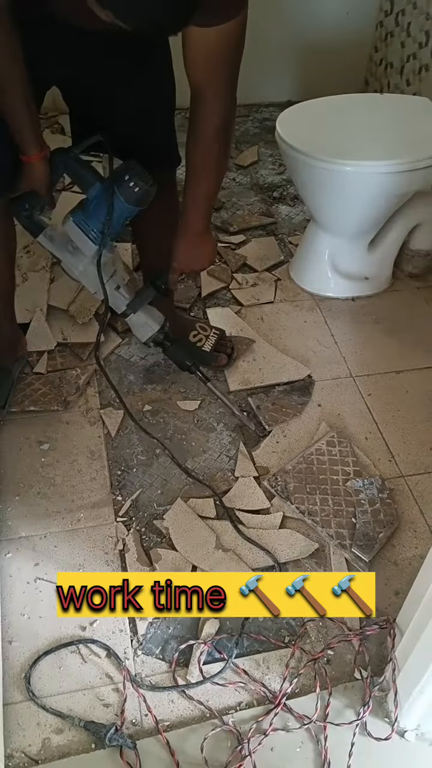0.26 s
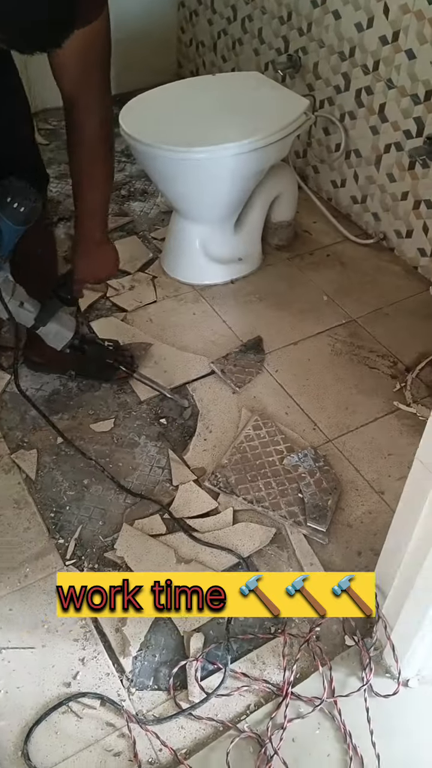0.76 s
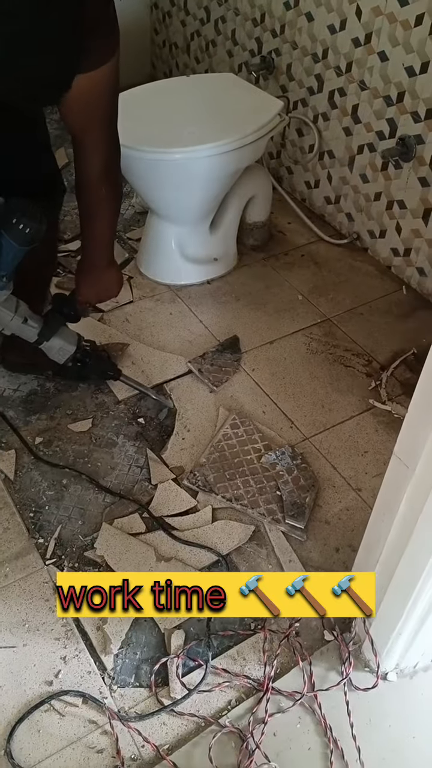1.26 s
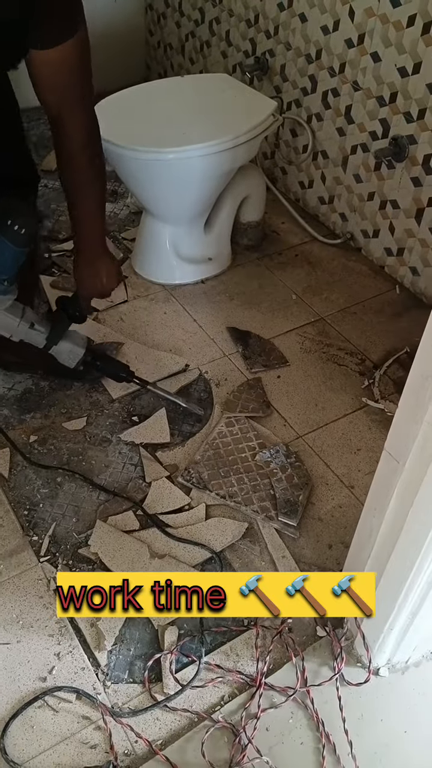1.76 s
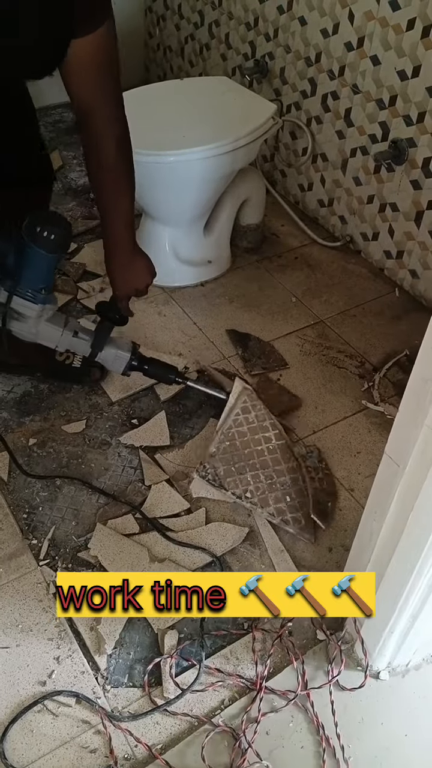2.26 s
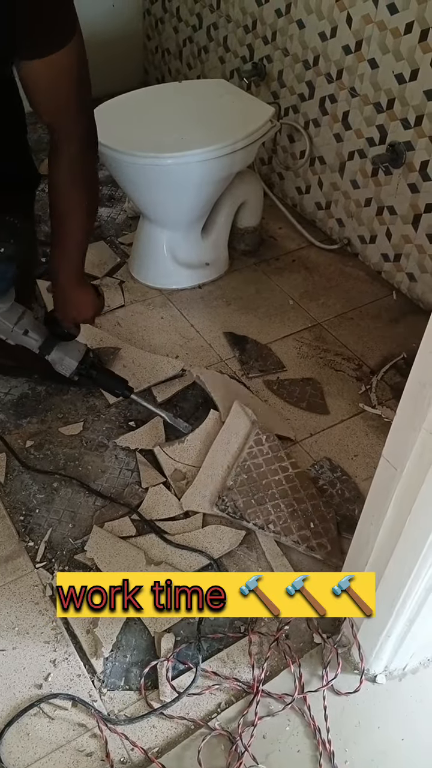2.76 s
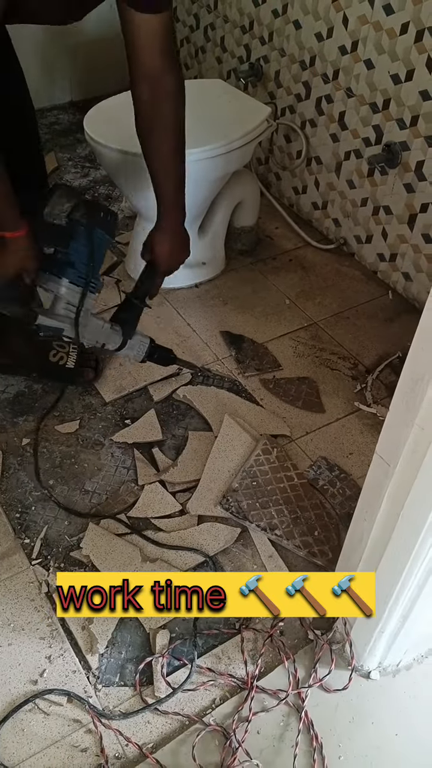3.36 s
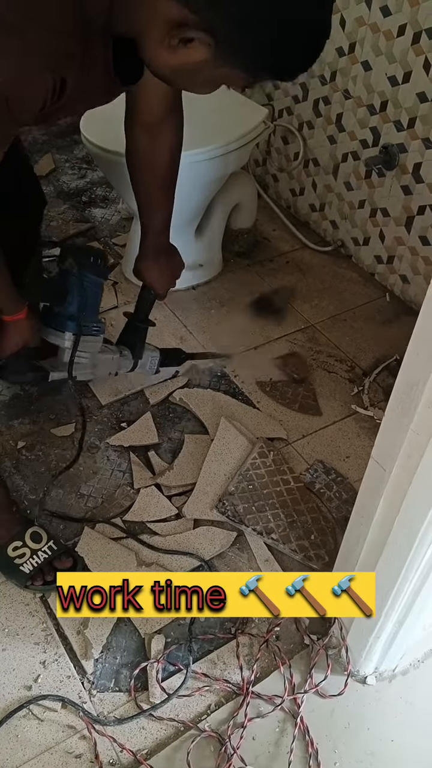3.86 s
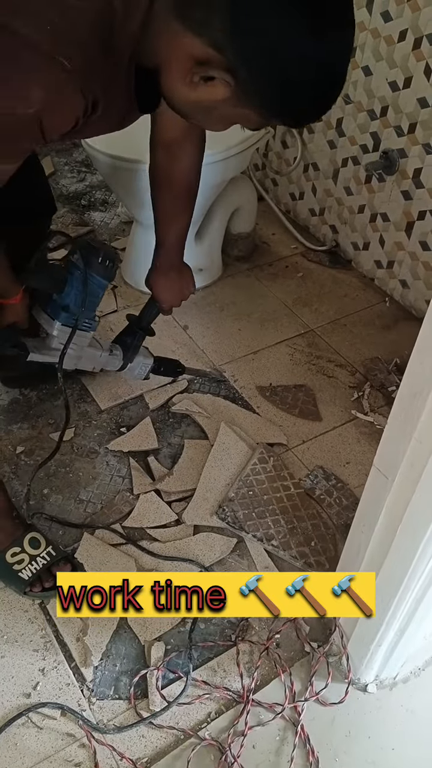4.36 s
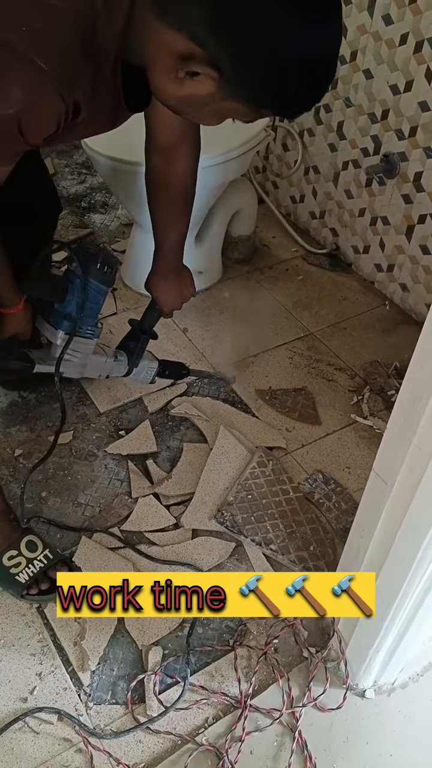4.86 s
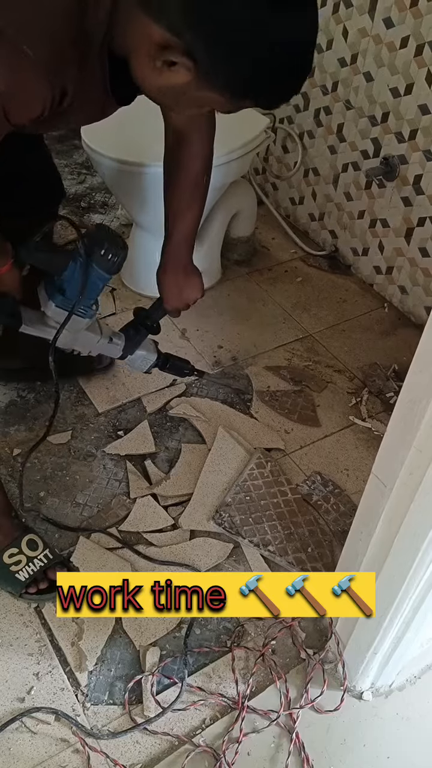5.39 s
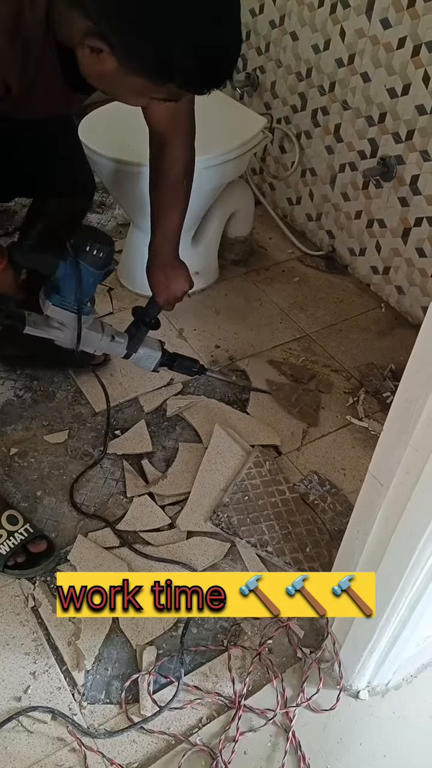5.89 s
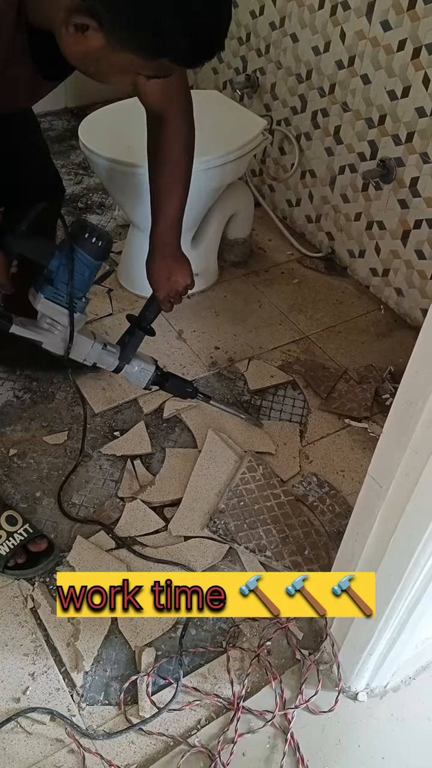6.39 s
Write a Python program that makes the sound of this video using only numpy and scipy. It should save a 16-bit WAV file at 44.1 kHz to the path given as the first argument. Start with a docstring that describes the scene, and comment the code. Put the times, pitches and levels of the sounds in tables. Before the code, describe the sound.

A close phone captures an electric demolition hammer in a small, echoing tiled bathroom. It starts mid-action with a 0.1-second burst of rapid hard blows, about 47 a second; shards ping at 0.3 and 0.7 while the motor whirs down. Grit crunches softly and a foot thuds near 1.1. Bursts at 1.5-1.7 and 2.1-2.4 sound hollower, the second booming with low air buffeting, ending in loud tile clatter and bright chisel clinks. From 2.5 to 3.8 pieces slide and ring, crumbs crunch and sandals scuff. A weaker, crisp burst comes at 3.9-4.1, followed by a clatter and a bright chip ping. Ringing bursts follow at 4.6-4.9 and 5.0-5.2, the latter ending in a dull shank rattle. Grit and a faint step lead to a partly hollow burst at 5.9-6.2, then small steel clinks, coasting motor and a low tile knock at 6.6.

```python
"""A short burst of hard blows opens: an electric demolition hammer chisels floor tiles in a small, hard bathroom.
Each blow cracks tile, rings the chisel and drums the floor; the motor whirs, then coasts down after each burst.
Struck modes make tile pieces clatter and the loose chisel clink; noise flurries make grit crunch under sandals.
Tiled walls answer with dense echoes. A phone close by turns the loud parts down with its gain control."""
import sys
import numpy as np
from scipy import signal
from scipy.fft import rfft, irfft, next_fast_len
from scipy.io import wavfile
from scipy.ndimage import uniform_filter1d, map_coordinates

SR = 44100
rng = np.random.default_rng(int(sys.argv[2]) if len(sys.argv) > 2 else 0)


def unload_wav(signal):
    """Save mono or channel-first audio to the path in sys.argv[1] as 16-bit WAV at rate SR, clipped to [-1, 1]."""
    wavfile.write(
        sys.argv[1],
        SR,
        np.round(np.clip(np.atleast_2d(signal).T, -1, 1) * 32767).astype(np.int16),
    )


N = 292383
TIME = np.arange(N) / SR  # s

# trigger pulls: first blow t/s, trigger release t/s, force level/dB, hollowness under the tile [0-1],
# air buffet level/dB
TRIGGER_PULLS = [(0.002, 0.099, -4, 0.12, -35), (1.482, 1.732, -4.5, 0.52, -24),
                 (2.139, 2.381, -4.5, 0.85, -12.5), (3.94, 4.095, -10.5, 0, -21.5),
                 (4.594, 4.896, -7, 0.05, -29), (4.995, 5.234, -5.5, 0.19, -19.5),
                 (5.875, 6.184, -5.5, 0.47, -28)]
# spectrum of tile clattering on the floor: f/Hz, level/dB per Hz
CLATTER_SPECTRUM = [(40, -54), (100, -21.5), (450, -12), (780, -5.5), (1100, 2.5), (1600, -1), (2700, 3.5),
                    (4400, -3.5), (8200, -13.5), (15800, -42)]
# spectrum of crushed and scraped grit: f/Hz, level/dB per Hz
GRIT_SPECTRUM = [(120, -15.5), (600, 1.5), (2500, 1), (5200, -1.5), (8500, -9.5), (15800, -23.5)]


def amp(db):
    """Decibels to gain."""
    return 10 ** (np.asarray(db) / 20)


def unit(x):
    """Scaled to rms 1."""
    return x / np.sqrt(np.mean(x ** 2) + 1e-20)


def along(points, hz):
    """(f/Hz, value) points read on a log frequency axis."""
    f, v = np.transpose(points)
    return np.interp(np.log(hz + 1), np.log(f + 1), v)


def wobble(rate):
    """A smooth random curve with rate knots a second."""
    knots = rng.standard_normal(int(N * rate / SR) + 4)
    return map_coordinates(knots, [TIME * rate])


def filtered(x, response):
    """x with its spectrum multiplied by a response of frequency."""
    m = next_fast_len(N + SR // 2)
    hz = np.fft.rfftfreq(m, 1 / SR)
    return irfft(rfft(x, m) * response(hz), m)[..., :N]


def through(x, answer):
    """x convolved with an impulse answer, at its own length."""
    return signal.fftconvolve(x, answer)[:len(x)]


def colour(points, size=4096):
    """Causal impulse answer of energy 1 with the given spectrum, by folding its cepstrum."""
    level_db = along(points, np.fft.rfftfreq(size, 1 / SR))
    cepstrum = irfft(np.log(amp(level_db)))
    cepstrum[1:size // 2] *= 2
    cepstrum[size // 2 + 1:] = 0
    answer = irfft(np.exp(rfft(cepstrum)))
    return answer / np.linalg.norm(answer)


def ring(modes, size=4096, bass_hz=550):
    """Impulse answer of energy 1 of (f/Hz, width/Hz, level/dB) modes; a small object radiates no bass."""
    t = np.arange(size) / SR
    answer = np.zeros(size)
    for hz, width, db in modes:
        decay = np.exp(-np.pi * width * t)
        answer += amp(db) * width * decay * np.sin(2 * np.pi * hz * t)
    high_pass = signal.butter(2, bass_hz, "high", fs=SR, output="sos")
    answer = signal.sosfilt(high_pass, answer)
    return answer / np.linalg.norm(answer)


def contacts(length, rise, spiky_db, size=16384):
    """A flurry of tiny contacts of uneven force that swells and dies away; length and rise in s."""
    t = np.arange(size) / SR
    swell = (1 - np.exp(-t / max(rise, 1 / SR))) ** 2
    shape = swell * np.exp(-t / max(length, .001))
    force = amp(spiky_db * np.repeat(rng.standard_normal(size // 64), 64))
    flurry = shape * force * rng.standard_normal(size)
    return flurry * np.linalg.norm(shape) / np.linalg.norm(flurry) / shape.max()


def add(track, s, sound):
    """Mix a sound into a track at time s."""
    part = track[max(round(s * SR), 0):][:len(sound)]
    part += sound[:len(part)]


def spread(a, b):
    """Two signals become left and right, most alike around 140 to 300 Hz, less in the deep bass, not in the treble."""
    # likeness of the two microphone ports: f/Hz, correlation [0-1]
    likeness = [(60, .2), (140, .55), (290, .7), (640, .12), (1400, 0)]

    def turn(hz):
        return np.arccos(np.clip(along(likeness, hz), -1, 1)) / 2

    mid = filtered(a, lambda hz: np.cos(turn(hz)))
    side = filtered(b, lambda hz: np.sin(turn(hz)))
    return np.array([mid + side, mid - side])


def blow(snap=0.17):
    """Steel meets steel with a snap, then the tip crushes tile; the crush has energy 1 before the snap."""
    crush = contacts(.004, rise=.0005, spiky_db=4, size=1024)
    crush /= np.linalg.norm(crush)
    crush[0] += snap
    return crush


def hammer(blow_hz=46.58, run_out_s=0.0057, rattle_db=-8, run_up_s=0.014, free_s=0.038, free_db=7):
    """The striker hits the chisel at a steady rate: tile cracks, steel rings, the floor drums."""
    # modes of the chisel pressed into the tile: f/Hz, width/Hz, level/dB
    pressed_modes = [(4340, 450, -16), (5260, 200, -13), (6500, 400, -13), (8460, 110, -13),
                     (10400, 80, -15), (11490, 130, 0), (12100, 80, -9), (14310, 160, -17)]
    # spectrum of cracking tile: f/Hz, level/dB per Hz
    crack_spectrum = [(40, -14), (150, 2.5), (700, 4), (1100, 9), (1600, -1), (2400, 6.5), (4400, 3.5),
                      (6600, -1.5), (7400, 1), (9600, -10), (11600, 0), (13000, -23), (15800, -11)]
    # spectrum of the drumming floor: f/Hz, level/dB per Hz
    drum_spectrum = [(40, -22), (110, -1.5), (220, -2), (340, 5.5), (670, 9.5), (1200, 0), (1900, 1.5),
                     (4000, -27.5)]
    free_hz = 8460  # the mode that sings out as the pressure eases
    crack, steel, drum = np.zeros((3, N))
    # the wandering tip damps each mode in turn
    seat_db = 4 * np.array([wobble(10) for _ in pressed_modes])
    for start, stop, force_db, hollow, _ in TRIGGER_PULLS:
        # a bedded tile makes the chisel ring; a hollow one drums instead
        steel_db = force_db - 2 - 15 * hollow
        drum_db = force_db - 14 + 19 * hollow
        # the bit rattles ever harder before it bites
        run_up = (TIME < start) * np.exp(-abs(TIME - start) / run_up_s)
        crack += amp(force_db + rattle_db) * run_up * rng.standard_normal(N)
        for s in np.arange(start, stop + .1, 1 / blow_hz):
            force = np.sqrt(SR / blow_hz) * amp(rng.normal(0, 1))
            force *= np.exp(-max(s - stop, 0) / run_out_s)  # blows weaken once the trigger is let go
            free = np.exp(-max(stop - s, 0) / free_s)
            modes = []
            for (hz, width, db), seat in zip(pressed_modes, seat_db[:, round(s * SR)]):
                modes.append((hz, width, db + seat + free_db * free * (hz == free_hz)))
            # a tile booms as it lifts off its bed, until it breaks
            progress = min((s - start) / (stop - start), 1)
            loose = np.sqrt(abs(np.sin(np.pi * progress ** 0.53)))
            bite = 1 - hollow * (s == start)  # a hollow tile yields to the first blow
            add(crack, s, amp(force_db) * force * bite * blow())
            steel_ring = signal.fftconvolve(blow(), ring(modes, size=1024))
            add(steel, s, amp(steel_db) * force * steel_ring)
            add(drum, s, amp(drum_db) * force * loose * blow())
    return through(crack, colour(crack_spectrum)) + steel + through(drum, colour(drum_spectrum))


def holder():
    """As the pressure comes off, the shank chatters in its holder: one broad, dull resonance."""
    # the one rattle: t/s, level/dB, length/s, f/Hz, width/Hz
    shank_rattle = (5.2, 1.6, 0.014, 2810, 550)
    s, db, length, hz, width = shank_rattle
    track = np.zeros(N)
    chatter = contacts(length, rise=length / 2, spiky_db=12.5)
    add(track, s, amp(db) * through(chatter, ring([(hz, width, 0)], bass_hz=hz / 2)))
    return track


def motor(crank_hz=46.7, whir_db=-24, whine_db=-37, tooth_hz=2750, lead_s=0.024, spin_up_s=0.012, coast_s=0.67):
    """Fan and gears spin up just before the first blow and coast down once the trigger is let go."""
    # spectrum of the whir: f/Hz, level/dB per Hz
    whir_spectrum = [(60, -30.5), (700, -6.5), (1150, -0.5), (1650, -8), (2200, 2), (2900, 0.5),
                     (5300, -9.5), (6400, -5.5), (8300, -11.5), (15800, -30)]
    speed = np.zeros(N)  # 1 is full speed
    for start, stop, *_ in TRIGGER_PULLS:
        up = 1 - np.exp(-np.maximum(TIME - start + lead_s, 0) / spin_up_s)
        coast = np.exp(-np.maximum(TIME - stop, 0) / coast_s)
        speed = np.maximum(speed, up * coast)
    crank = 2 * np.pi * np.cumsum(crank_hz * speed) / SR
    whir = through(rng.standard_normal(N), colour(whir_spectrum))
    whir *= 1 + 0.43 * np.sin(crank)  # the piston loads the gears once a turn
    tooth_rate = tooth_hz * speed * (1 + 0.0099 * wobble(150))
    mesh = 2 * np.pi * np.cumsum(tooth_rate) / SR
    whine = unit(np.sin(mesh) + .7 * np.sin(2 * mesh) + .7 * np.sin(3 * mesh))
    return speed ** 3.02 * (amp(whir_db) * whir + amp(whine_db) * whine)


def shards(level_db=-8.5, landing=1.0, slide_s=0.21, damping=0.81):
    """Pieces of tile land on an edge, flop flat and chatter; size sets the pitch, rubble damps the modes."""
    # falling and sliding shards: t/s, level/dB, main mode f/Hz, clatter length/s, ring level/dB
    # (one that lands free rings on, one among rubble is damped)
    shard_falls = [(0.302, -5, 2686, 0.003, 7.5), (0.326, -12, 2658, 0.0053, 10.5),
                   (0.579, -25.5, 2670, 0.0047, 9), (0.671, -13, 2760, 0.0088, 7.5),
                   (0.682, -5, 2680, 0.0042, -1), (1.8, 2.5, 3180, 0.0095, -11),
                   (2.316, 8.5, 2670, 0.057, -10), (2.538, -12.5, 2380, 0.027, -1.5),
                   (2.671, -2.5, 2740, 0.025, -24), (2.849, -25, 2700, 0.034, 2),
                   (3.053, -8, 2530, 0.03, -7), (3.098, 3, 2663, 0.024, -4),
                   (3.444, -20.5, 2320, 0.0038, -7), (3.845, -24, 2410, 0.0071, -8),
                   (4.102, 0, 3040, 0.027, -25), (6.49, -17, 2460, 0.024, -26)]
    # modes of a reference shard: f/Hz, width/Hz, level/dB; the third is its main mode and beats with the fourth
    tile_modes = [(1070, 40, -4.5), (1600, 30, -5.5), (2680, 8, 8.5), (2725, 26, 0), (3800, 18, -4.5),
                  (4950, 22, -4), (5830, 35, -13), (6360, 26, -12), (7680, 50, -16)]
    main_mode_hz = 2680
    clatter, ringing = np.zeros((2, N))
    body = colour(CLATTER_SPECTRUM)
    freest_db = max(row[-1] for row in shard_falls)
    for s, db, hz, length, ring_db in shard_falls:
        chatter = amp(1) * contacts(.0042, rise=0, spiky_db=-1.0)  # the edge
        # the flop 8 ms later: long slides swell, short drops are sharp
        add(chatter, .008, contacts(length, rise=length ** 2 / slide_s, spiky_db=0.0))
        damped = amp(damping * (freest_db - ring_db))
        strike = chatter * np.sqrt(1 - .9 / damped)
        # a free piece rings from its first contact
        strike[0] += landing * np.linalg.norm(chatter) / np.sqrt(damped)
        modes = []
        for f, width, level in tile_modes:
            modes.append((f * hz / main_mode_hz, width * np.sqrt(damped), level + rng.normal(0, 0.98)))
        add(clatter, s, amp(db + level_db + 3.5) * through(chatter, body))
        add(ringing, s, amp(db + level_db + ring_db) * through(strike, ring(modes, size=12288)))
    return clatter, ringing


def clinks(level_db=18, focus_db=7, focus_octaves=0.26, scrape=0.0068, side_scrape=.04):
    """The free chisel knocks on tile edges; where it is touched picks the modes, a glancing touch scrapes too."""
    # knocks: t/s, level/dB, brightest mode f/Hz, place [on the tip 0 to on the flank 1]
    knocks = [(1.8063, -2.5, 6260, 0), (1.8694, -13.5, 7920, 0.14), (2.3794, 6.5, 7920, 0.11),
              (2.4238, 0, 7910, 0.76), (2.4458, 7, 6430, 0.27), (6.3075, -5.5, 3800, 0.8),
              (6.324, -15, 3740, 0.78), (6.3665, -7.5, 7500, 0.61), (6.379, -10.5, 2150, 0.34),
              (6.4288, -15.5, 3740, 0.64)]
    # modes of the chisel hanging free: f/Hz, width/Hz, struck on the tip level/dB, on the flank level/dB
    loose_modes = [(2121, 28, -18, 4), (3740, 13, -9, 5), (5380, 70, -18, -8), (5640, 26, 1, -32),
                   (6600, 40, -2, -22), (7890, 34, -1, -2), (9870, 45, -22, -14)]
    track = np.zeros(N)
    for s, db, bright_hz, sideways in knocks:
        touch = contacts(.007, rise=.0005, spiky_db=5, size=8192)
        modes = []
        for hz, width, tip, flank in loose_modes:
            away = min(abs(np.log2(hz / bright_hz)) / focus_octaves, 1)
            focus_cut_db = focus_db * (1 - .5 * sideways) * away
            modes.append((hz, width, tip + sideways * (flank - tip) - focus_cut_db))
        steel = ring(modes, size=8192)
        scraping = (scrape + side_scrape * sideways) * through(touch, colour(GRIT_SPECTRUM))
        add(track, s, amp(db + level_db) * (steel + scraping))
    return track


def chips(level_db=20, width_hz=70):
    """A small flake of tile pings with one bright mode."""
    # pings: t/s, level/dB, f/Hz
    pings = [(0.924, -33, 5170), (2.552, -5.5, 4290), (4.12, 0, 4500)]
    track = np.zeros(N)
    for s, db, hz in pings:
        add(track, s, amp(db + level_db) * ring([(hz, width_hz, 0)]))
    return track


def slabs(level_db=-6.5, clatter_db=2):
    """A broad piece rocks and knocks on the screed and answers with a low, short ring."""
    # rocking pieces: t/s, level/dB, lowest mode f/Hz, contact length/s
    rockings = [(0.127, -16.5, 1097, 0.06), (0.244, -23, 1100, 0.02), (6.574, -14.5, 1137, 0.013)]
    # modes of a broad piece: ratio to its lowest mode, width/Hz, level/dB
    slab_modes = [(1, 55, 0), (1.17, 90, -8), (1.53, 80, -10)]
    track = np.zeros(N)
    for s, db, hz, length in rockings:
        rocking = contacts(length, rise=.002, spiky_db=5)
        modes = ring([(ratio * hz, width, level) for ratio, width, level in slab_modes])
        knock = through(rocking, modes)
        clatter = amp(clatter_db) * through(rocking, colour(CLATTER_SPECTRUM))
        add(track, s, amp(db + level_db) * (knock + clatter))
    return track


def rubble(grit_db=-10, step_db=-1, scuff_swell_s=0.016, scuff_stop_s=.015, thud_s=0.012):
    """Mortar crumbs crunch in flurries, the longer the softer their start; sandals scuff and thud."""
    # crumbs crushed under the tool: t/s, level/dB, length/s
    crumbs = [(0.242, -21, 0.013), (0.513, -15.5, 0.014), (0.767, -21.5, 0.014), (0.916, -24, 0.014),
              (1.327, -25.5, 0.0082), (2.982, -21, 0.051), (3.438, -20, 0.029), (3.5255, -15, 0.013),
              (3.705, -33, 0.016), (3.841, -26, 0.015), (5.618, -20, 0.019), (6.284, -19, 0.014)]
    # footfalls: t/s, thud level/dB, scuff level/dB
    footfalls = [(1.114, -20, -24), (3.547, -31, -29.5), (4.488, -24.5, -25), (5.765, -30, -28.5)]
    # spectrum of the landing sole: f/Hz, level/dB per Hz
    sole_spectrum = [(40, -24), (95, -1), (150, 4), (250, 7.5), (420, -10), (1000, -57)]
    grit, soles = np.zeros((2, N))
    for s, db, length in crumbs:
        flurry = contacts(length, rise=.6 * length, spiky_db=6)
        add(grit, s - length / 3, amp(db + grit_db) * flurry)
    for s, db, scuff_db in footfalls:
        # reversed: the sole presses ever harder into the grit, then stops fast
        scuff = contacts(scuff_swell_s, rise=scuff_stop_s / 2, spiky_db=10)[::-1]
        add(grit, s + scuff_stop_s - len(scuff) / SR, amp(scuff_db) * scuff)
        add(soles, s, amp(db + step_db) * contacts(thud_s, rise=0.00081, spiky_db=9))
    return through(grit, colour(GRIT_SPECTRUM)) + through(soles, colour(sole_spectrum))


def buffet(corner_hz=62, lumpy_db=3):
    """Cooling air from the running motor puffs against the microphone ports as lumpy low noise."""
    flow = np.zeros(N)
    for start, stop, *_, db in TRIGGER_PULLS:
        puff_times = [start, (start + stop) / 2, stop, stop + 0.018]
        flow += amp(db) * np.interp(TIME, puff_times, [0, 1, 1, 0])
    noise = spread(*rng.standard_normal((2, N)))
    air = filtered(noise, lambda hz: hz / (hz + 45) / (1 + (hz / corner_hz) ** 2))
    return flow * unit(unit(air) * amp(lumpy_db * wobble(25)))


def echoes(x, size=2048):
    """Dense wall echoes as decaying noise, redrawn for each short overlapping piece so no fixed colour stands out."""
    # decay of the tiled room: f/Hz, time to fall 60 dB t/s
    wall_decay = [(100, 0.42), (500, 0.29), (1500, 0.29), (4000, 0.3), (9000, 0.21), (15000, 0.15)]
    # overlapping windowed pieces, each with a tail of its own
    padded = np.pad(x, (size, 2 * size))
    pieces = np.lib.stride_tricks.sliding_window_view(padded, 2 * size)[::size]
    pieces = pieces * signal.windows.cosine(2 * size)
    noise = rng.standard_normal((len(pieces), SR // 2))
    hz, t, z = signal.stft(noise, SR, nperseg=256)
    decay = amp(-60 * t / along(wall_decay, hz)[:, None])
    tails = signal.istft(z * decay, SR, nperseg=256)[1]
    tails /= np.linalg.norm(tails, axis=1, keepdims=True)
    track = np.zeros(N + size)
    for k, answer in enumerate(signal.fftconvolve(pieces, tails, axes=1)):
        add(track, k * size / SR, answer)
    return track[size:]


def bathroom(tool, debris, direct_db=-7, wet_db=-1, lag_s=.00047):
    """Tiled walls answer at once; the tool reaches the left port first, the debris lies straight ahead."""
    late_tool = np.interp(TIME - round(lag_s * SR) / SR, TIME, tool)
    direct = debris + np.array([tool, late_tool])
    wet = spread(echoes(tool + debris), echoes(tool + debris))
    return amp(direct_db) * direct + amp(wet_db) * wet


def background():
    """Faint steady noise behind the work, strongest in the low range, at rms 1."""
    # spectrum of the quiet room: f/Hz, level/dB
    quiet_spectrum = [(25, 4), (280, 9), (1100, 4.5), (7000, -17), (15000, -40)]
    noise = spread(*rng.standard_normal((2, N)))
    return unit(filtered(noise, lambda hz: amp(along(quiet_spectrum, hz))))


def scene(quiet_db=-46, ring_straight_db=-9.5, ring_room_db=-2.5):
    """All the work in the room over a faint background; ringing pieces reach the phone more directly."""
    clatter, shard_rings = shards()
    ringing = shard_rings + clinks() + chips()
    debris = clatter + slabs() + rubble() + amp(ring_room_db) * ringing
    tool = hammer() + holder() + motor()
    work = bathroom(tool, debris) + amp(ring_straight_db) * ringing
    return work + buffet() + amp(quiet_db) * background()


def record(dry, ceiling_db=-10.5, release_db_per_s=55, window_s=0.0039, top_hz=15750):
    """The phone: port colour, a fast gain control that recovers slowly, clipping and a band limit."""
    # colour of the two microphone ports: f/Hz, left minus right level/dB
    port_difference = [(250, 0), (520, -2.5), (1200, -6), (1900, 0.5), (2700, -1), (4200, -5.5),
                       (6600, -14.5), (8300, 15.5), (11000, 7), (12300, -4.5), (14000, -17)]
    x = filtered(dry, lambda hz: amp(np.outer([.5, -.5], along(port_difference, hz))))
    power = abs(uniform_filter1d(np.mean(x ** 2, axis=0), max(int(window_s * SR), 1)))
    over_db = np.maximum(10 * np.log10(power + 1e-12) - ceiling_db, 0)
    # the cut jumps up with the level and falls back at the release rate
    recovery_db = release_db_per_s * TIME
    cut_db = np.maximum.accumulate(over_db + recovery_db) - recovery_db
    return filtered(np.clip(x * amp(-cut_db), -1, 1), lambda hz: hz < top_hz)


dry = scene()
out = record(dry)
unload_wav(out)
```